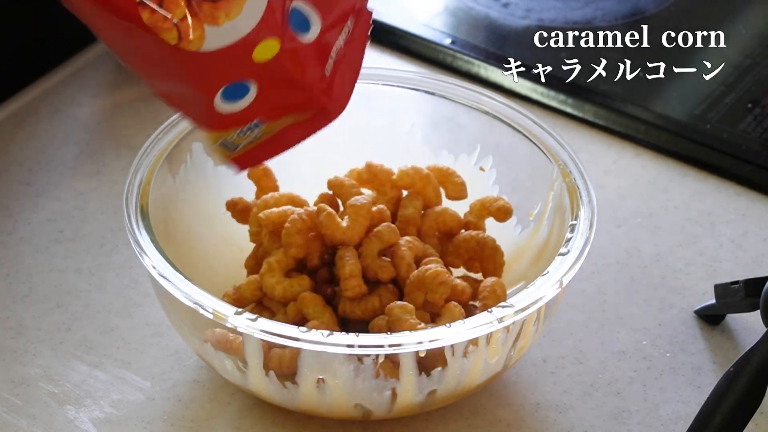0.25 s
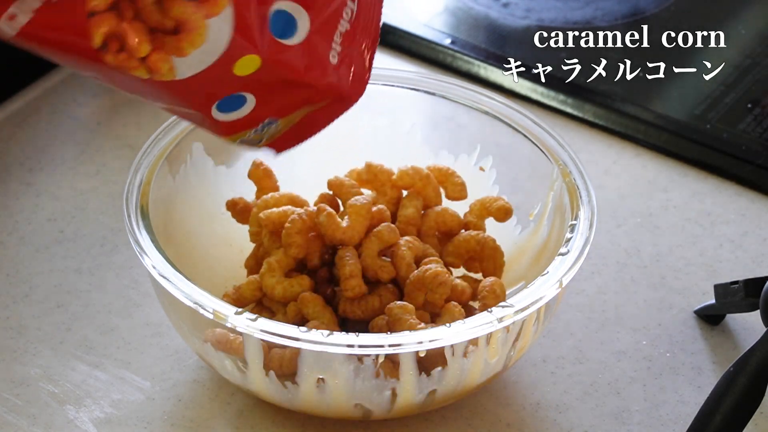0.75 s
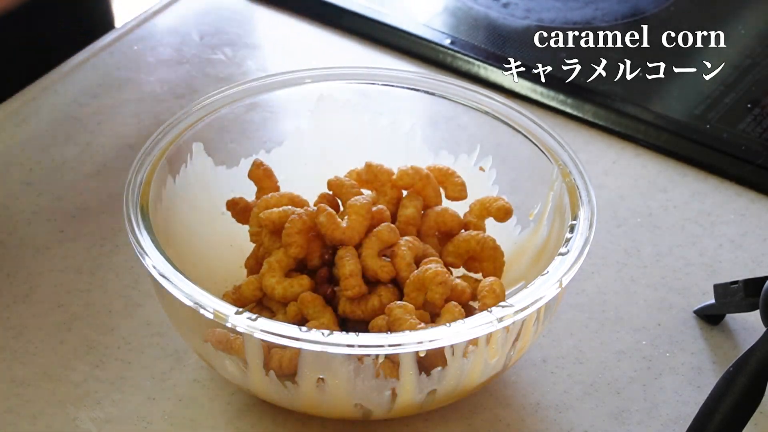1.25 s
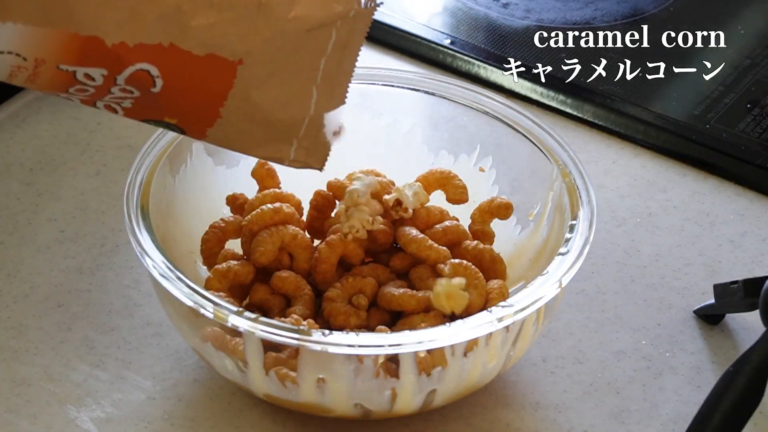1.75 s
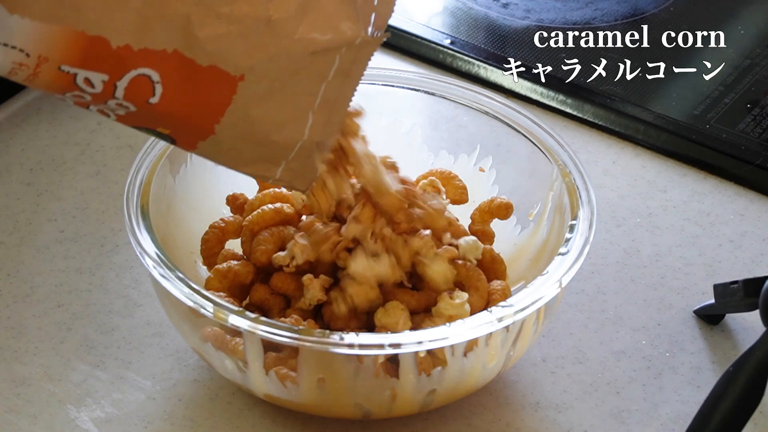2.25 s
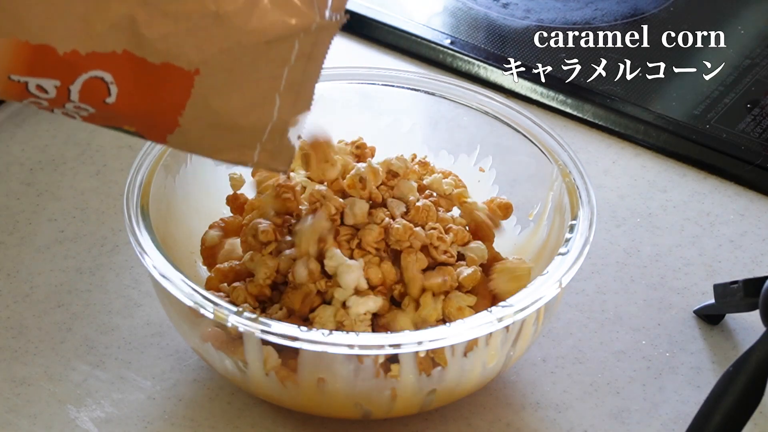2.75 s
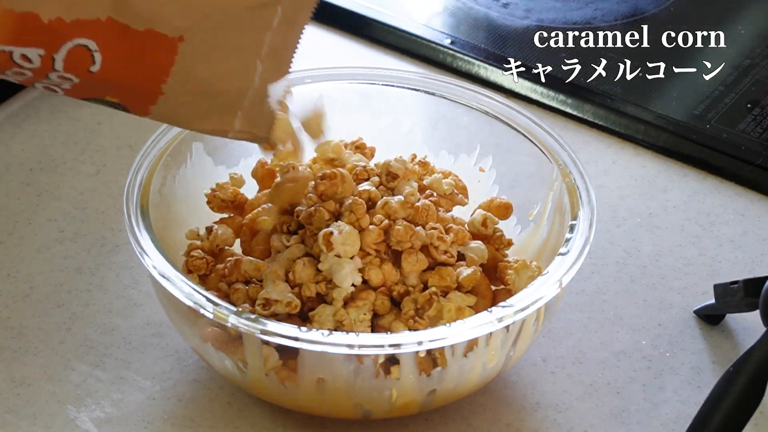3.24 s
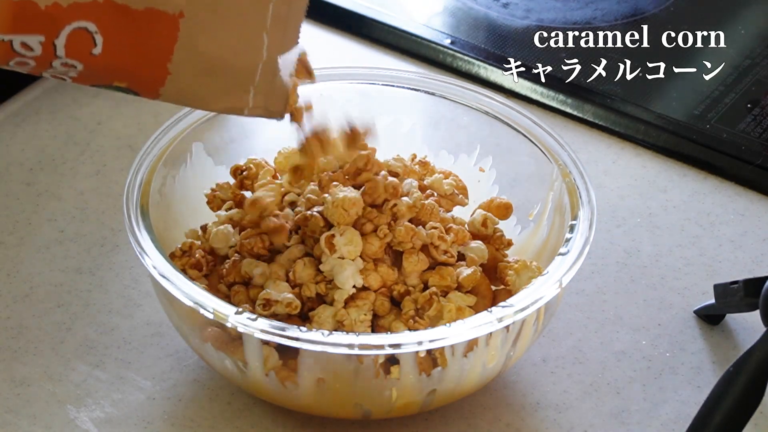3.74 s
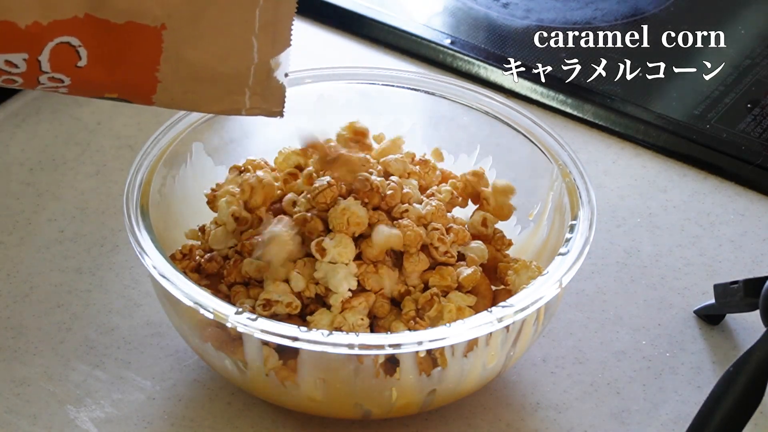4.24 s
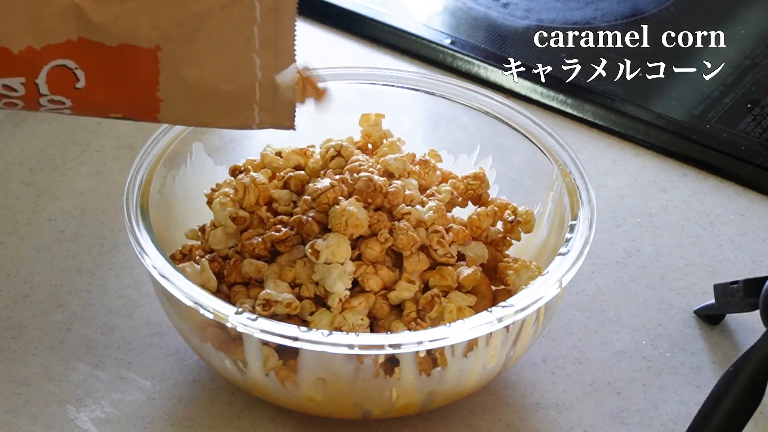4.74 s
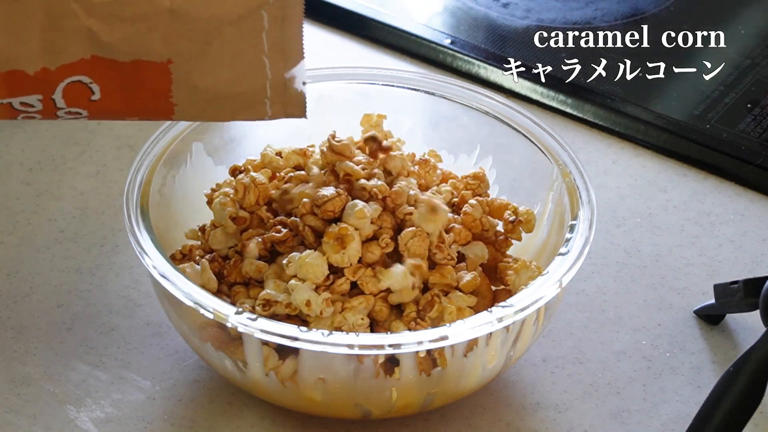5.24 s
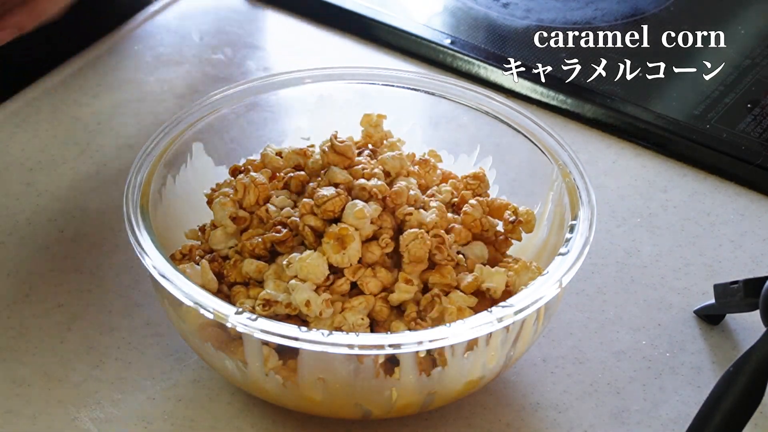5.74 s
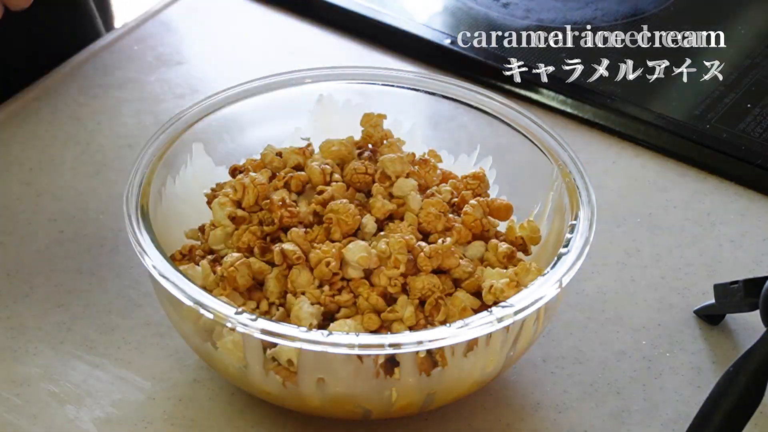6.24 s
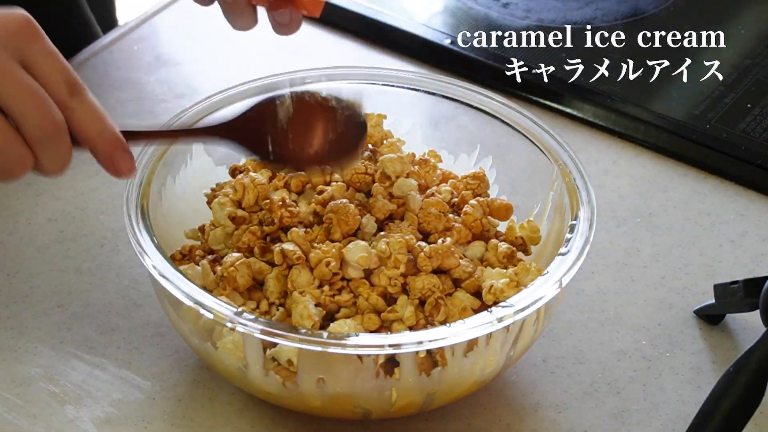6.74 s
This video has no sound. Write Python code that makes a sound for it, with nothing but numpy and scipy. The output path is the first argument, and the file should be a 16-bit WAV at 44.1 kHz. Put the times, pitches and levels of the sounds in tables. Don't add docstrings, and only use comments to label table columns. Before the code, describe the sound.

Puffed snacks and popcorn are shaken into a glass bowl on a counter, heard close in a small, dry kitchen. A bag snaps and is put aside dully; a second bag pours a thick crackling rustle, then smaller spurts with crisp snaps, hollow knocks and fine ticks. The pour dwindles, the empty bag scrapes and crumples loudly, then cuts to near silence over a low fridge hum, with a faint rustle at the very end.

```python
import sys
import numpy as np
from scipy import signal
from scipy.fft import rfft, irfft
from scipy.io import wavfile
from scipy.ndimage import uniform_filter1d

SR = 44100
rng = np.random.default_rng(int(sys.argv[2]) if len(sys.argv) > 2 else 0)


def field_ratio(decibels):
    return 10 ** (np.asarray(decibels, dtype=float) / 20)


def transcribe(u):
    v = np.clip(np.atleast_2d(u).T, -1, 1)
    q = np.round(v * 32767).astype(np.int16)
    wavfile.write(sys.argv[1], SR, q)


N = 308244

SHOT_EDGES = [0, 1.3935, 6.2475, 6.9185, 7]
BANDS_HZ = 2 ** np.arange(4.6, 14.3, .4)
# (frequency [Hz], level per Hz [dB])
PIECES_COLOUR = [(88, -28), (150, -13), (336, -7.5), (442, -7), (617, -9.5), (736, -2.5), (950, 0),
                 (1460, -1), (4310, -3.5), (9280, -12.5), (15200, -23.5), (16400, -20)]
CENTRES_HZ = [850, 2600, 6400, 12000]
USUAL_DB = [-4, 0, -5, -13]
# (time [s], rustle [dB], brightness [dB per octave])
FIRST_BAG = [(0.0, -42, 2.5), (0.16, -62, .3), (0.3, -72.5, -1.5), (0.86, -77, 5), (1.0, -53, 1.5),
             (1.13, -52, -3.5), (1.23, -55, 0), (1.393, -68, -6)]
# (time [s], rustle [dB], brightness [dB per octave])
FLOW = [(1.39, -47, 0), (1.45, -51.5, 2.5), (1.58, -44, -2), (1.71, -42.5, -0.5), (1.88, -38.5, -2),
        (2.19, -32, -0.8), (2.39, -31, 0.5), (2.67, -37.5, 2), (2.89, -44.5, 0.5), (3.17, -59.5, -2.5),
        (3.36, -37.5, 0.1), (3.75, -45, -1), (4.07, -40.5, -0.5), (4.41, -53.5, 2), (4.54, -56.5, -1),
        (5.05, -48.5, -2), (5.3, -52.5, 1), (5.5, -55, 0.5)]
# (time [s], rustle [dB], brightness [dB per octave])
DRAG = [(5.53, -53, -1), (5.62, -39, 1.5), (5.7, -32.5, 0.9), (5.79, -26, -2), (5.871, -23.5, -1),
        (5.97, -35, -0.5), (6.08, -38, -3), (6.22, -45.5, -0.8), (6.246, -46.5, 0)]
# (time [s], peak [dB], crackle [dB], pitch [octaves above 1 kHz])
HANDLING = [(0.0064, -14, -22.5, 2.3), (0.078, -21, -36, 1.8), (0.948, -16, -28.5, 2.9),
            (0.9874, -30, -52, 1), (1.0028, -12.5, -25, 1.2), (1.0374, -25, -34, 1.2),
            (1.063, -20, -34, 3.1), (1.093, -26, -32, 2.4), (1.1247, -25, -41, 2.5),
            (1.1303, -17, -43, 1.5), (1.1472, -17, -21.5, 1.14), (1.1593, -15, -22, 2.1),
            (1.279, -35.5, -36, 0.46), (1.333, -28, -35, 2.3), (1.34, -33, -40, 1.3),
            (5.6724, -25.5, -22, 0.74), (5.8147, -7, -27, 0.73), (5.9367, -14, -19, 2.4),
            (6.0154, -18.5, -23, 0.54), (6.0335, -23.5, -24.5, 1.1), (6.0536, -2, -6.5, 1.6),
            (6.112, -21, -25, 0.65), (6.129, -35, -20, 0.34), (6.2412, -13.5, -29, 1.6),
            (6.925, -31, -32, 2)]
# (time [s], peak [dB],
# crackle [dB], pitch [octaves above 1 kHz])
POURING_SNAPS = [(1.394, -23, -26.5, 1.6), (1.502, -19, -22, 1.1), (1.5187, 2.5, -6, 3.06),
                 (1.545, -13.5, -17.5, 1.2), (1.577, -16, -23, 0.76), (1.5921, -15, -19, 1.6),
                 (1.647, -27, -28, 0.85), (1.7447, -17.5, -22.5, 1.8), (1.8013, -18.5, -17.5, 1.5),
                 (1.8077, -20, -35, 1.4), (1.8884, -28, -24, 2.1), (1.9233, -16, -24, 0.76),
                 (1.96, -12, -15, 3.7), (1.9798, -7, -10.5, 1.96), (2.0163, -3, -15, 1.9),
                 (2.0204, -19, -14.5, 2.6), (2.043, -17, -13, 2.6), (2.136, -20, -25, 2),
                 (2.1787, -20, -19.5, 1.9), (2.2261, -7, -23.5, 1.2), (2.281, -18, -18, 1.7),
                 (2.415, -16, -26, 2.9), (2.479, -12, -28, 2.4), (2.6097, -20, -24, 1.6), (2.6898, -22, -26, 3.6),
                 (2.754, -11.5, -20, 1.2), (2.779, -16.5, -21, 1.6), (2.871, -23, -29, 3.3),
                 (2.924, -28, -34, 1.1),
                 (2.965, -31, -29.5, 3.3), (3.079, -20, -24.5, 3.6), (3.1533, -27.5, -51, 0.92),
           (3.198, -19, -30, 1.3), (3.2588, -2.5, -7, 2), (3.2674, -1.5, -29, 2.5), (3.2902, 2, -17, 3.1),
           (3.295, 0, -12, 1.5), (3.499, -22, -26, 2.3), (3.5633, -14, -17, 4.8), (3.6232, -32, -30, 2.1),
           (3.6676, -16, -38, 2.4), (3.693, -22, -26, 3.5), (3.7326, -20, -27, 2.8), (3.79, -26, -25, 2.5),
           (3.831, -21, -21, 3), (3.88, -21, -19.5, 4.1), (3.8873, -23, -26, 1.8), (3.901, -22, -36, 1.9),
           (3.961, -21, -16, 0.58), (4.0487, -28, -34, 1.5), (4.0676, -10.5, -23, 2.8),
           (4.1198, -24, -24, 2.2), (4.1459, -14, -27, 3.7), (4.2223, -10, -23, 2.2),
           (4.267, -24, -23, 3.8), (4.312, -18, -21.5, 4.3), (4.3237, -14, -33, 2), (4.37, -29, -34, 1.2),
           (4.3964, -26, -28, 2.8),
                 (4.4095, -28, -29.5, 2.2), (4.5656, -24, -27, 1.96), (4.6787, -24, -41, 1.2),
               (4.726, -24, -42, 1.3), (4.7735, -23, -29.5, 0.87), (4.8624, -33, -36, 1.1),
               (4.889, -22, -34.5, 2.8), (4.9435, -20, -30, 0.89), (5.007, -28, -41, 1.2),
               (5.017, -22.5, -27.5, 1.6), (5.064, -30, -20.5, 1.2), (5.076, -34, -21, 1.1),
               (5.1362, -21, -24.5, 3.8), (5.1667, -17, -27, 3.7), (5.2478, -32, -27, 4.2),
               (5.284, -17.5, -33, 3.1), (5.4126, -30, -39, 2.1), (5.4698, -23.5, -35.5, 0.23)]
SNAPS = HANDLING + POURING_SNAPS


def at_hz(points, hz):
    points = np.array(points)
    return np.interp(np.log(hz), np.log(points[:, 0]), points[:, 1])


def rms_one(x):
    return x / np.sqrt(np.mean(x ** 2) + 1e-20)


def band(x, low_hz, high_hz):
    return signal.sosfilt(signal.butter(2, [low_hz, high_hz], "band", fs=SR, output="sos"), x)


def ring(at_s, level_db, hz, t60):
    clicks = np.full(N, 1e-18)
    clicks[(np.asarray(at_s) * SR).astype(int)] = field_ratio(level_db)
    r, w = field_ratio(-60 / (t60 * SR)), 2 * np.pi * hz / SR
    return signal.lfilter([0, np.sin(w)], [1, -2 * r * np.cos(w), r * r], clicks)


def short_rings(s, peak_db, hz, cycles, spread):
    hz = hz[:, None] * 2 ** (spread * rng.standard_normal((len(s), 3)))
    turns = np.minimum(hz, 15000)[..., None] * np.arange(900) / SR
    soft_start = 1 - np.exp(-turns / (0.11 * cycles))
    rings = np.sum(np.sin(2 * np.pi * turns) * np.exp(-turns / cycles) * soft_start, axis=1)
    rings *= field_ratio(peak_db)[:, None] / np.abs(rings).max(axis=1, keepdims=True)
    where = (s * SR).astype(int)[:, None] + np.arange(900)
    return np.bincount(where.ravel(), rings.ravel(), N)


def rustle_and_snaps(rustle_db):
    # (frequency [Hz], side minus mid [dB])
    side_width = [(60, -20), (150, -36), (380, -13.5), (950, -20), (2380, -20), (5980, -6), (15000, -8)]
    busy = np.clip(field_ratio(.5 * (rustle_db[1] + 34.5)), .4, 6)
    wide = grains(700 * busy, spread_db=2.5, length_ms=2.0)
    crisp = grains(300 * busy, spread_db=1.5, length_ms=0.9)
    clumps = 0.51 + 0.46 * grains(45 * busy, spread_db=1.5, length_ms=32.0)
    where, shapes, snap_db = snap_shapes()
    white, out = rng.standard_normal((2, 2, N)), np.zeros((2, N))
    knots = N // 900 + 2
    place = np.interp(np.arange(N) / 900, np.arange(knots), rng.standard_normal(knots))
    white[:, 1] = 0.88 * white[:, 1] + 0.18 * place * white[:, 0]
    scrape = 0.34 * (np.abs(np.arange(N) / SR - 5.75) < .2)
    edges = BANDS_HZ[7:]
    for k, (low, high) in enumerate(zip(edges, edges[1:])):
        hz = np.sqrt(low * high)
        own_spread_db = -1.0 + 1.6 * np.clip(np.log2(hz / 3000), 0, 1)
        own = grains(900 * busy, own_spread_db, length_ms=np.clip(4000 / hz, .5, 8))
        treble = np.clip(np.log2(hz / 4000), 0, 1)
        shared = (1 - treble) * wide + treble * crisp
        contacts = (0.4 - 0.18 * treble) * shared + (0.36 + 0.1 * treble) * own
        contacts = contacts + scrape * (0.8 - contacts)
        power = field_ratio(2 * (shade_db(hz, rustle_db) + 9)) * contacts * clumps
        colour_db = shade_db(hz, snap_db) + 8.0 + 0.97 * rng.standard_normal(len(shapes))
        power += np.bincount(where, (field_ratio(2 * colour_db)[:, None] * shapes).ravel(), N)
        power = power * field_ratio(2 * empty_db(hz, np.arange(N)))
        level = np.sqrt(with_room(power, hz, room_db=-1.5))
        gain = field_ratio(at_hz(PIECES_COLOUR, hz)) * np.array([[1.4], [1.32 * field_ratio(at_hz(side_width, hz))]])
        out += gain * band(white[k % 2] * level, low, high)
    return out


def rustle_bands():
    # (time [s], rustle [dB], brightness [dB per octave])
    spoon = [
        (6.248, -85, 2.5),
        (6.67, -76.5, 4),
        (6.918, -80.5, 3.5),
        (6.919, -44.5, 2.5),
        (6.99, -54, 0.5),
    ]
    # (crest time [s], level [dB], length [s], brightness [dB per octave])
    slides = [(0.43, -67, 0.055, 2), (1.158, -48.5, 0.037, 4), (1.422, -43, 0.074, -2.5),
              (1.554, -35.5, 0.13, -2), (1.793, -36.5, 0.042, -1), (2.772, -46, 0.12, 0.5),
              (3.283, -41, 0.27, -0.8), (3.975, -33, 0.057, -0.5), (4.06, -42, 0.016, 2),
              (4.231, -37, 0.0073, 1.5), (4.602, -49, 0.048, -1.3), (4.767, -44.5, 0.055, -2.5),
              (4.928, -46, 0.037, 1.5), (5.081, -35, 0.055, -1.5), (5.171, -44, 0.06, 1)]
    t = np.arange(N) / SR
    s, levels, slopes = np.transpose(np.concatenate([FIRST_BAG, FLOW, DRAG, spoon]))
    level_db, bright = np.interp(t, s, levels), np.interp(t, s, slopes)
    up = np.log2(np.array(CENTRES_HZ) / CENTRES_HZ[1])[:, None]
    power = field_ratio(2 * (level_db + bright * up))
    shot = np.searchsorted(SHOT_EDGES, t)
    for s, db, length, slide_bright in slides:
        reach = length * np.where(t > s, 1.22, 1)
        swell = np.exp(-4 * ((t - s) / reach) ** 2) * (shot == np.searchsorted(SHOT_EDGES, s))
        power = power + field_ratio(2 * (db + slide_bright * up)) * swell
    return 10 * np.log10(power) + np.array(USUAL_DB)[:, None]


def grains(per_s, spread_db, length_ms):
    born = np.flatnonzero(rng.random(N) < 6000 / SR)
    draw = rng.random((len(born), 2))
    share = np.clip(per_s[born] / 6000, .01, 1)
    size = field_ratio(-2 * spread_db * np.maximum(np.log(draw[:, 1]), -4))
    clicks = np.zeros(N)
    clicks[born] = (draw[:, 0] < share) / share * size
    power = signal.lfilter([1], [1, -np.exp(-2000 / (length_ms * SR))], clicks + 1e-9)
    return power / power.mean()


def snap_shapes():
    s, peak_db, crackle_db, octaves = np.transpose(SNAPS)
    crest_db = (peak_db - crackle_db + 4.5)[:, None]
    ms = np.arange(2000) * 1000 / SR
    crack = field_ratio(1.25 * (crest_db - 12) + 1.5) * np.exp(-ms / 0.26)
    span = ms / np.interp(crest_db, [5, 11], [10, 3.2])
    rise = np.interp(crest_db, [5, 11], [2.5, 9])
    crackle = (1 - np.exp(-rise * span)) * np.exp(-span)
    crackle = crackle * field_ratio(4.3 * np.repeat(rng.standard_normal((len(s), 100)), 20, axis=1))
    crackle = 10.0 * crackle / np.sqrt(np.sum(crackle ** 2, axis=1, keepdims=True))
    where = np.minimum((s * SR).astype(int)[:, None] + np.arange(2000), N - 1)
    same_shot = np.searchsorted(SHOT_EDGES, where / SR) == np.searchsorted(SHOT_EDGES, s)[:, None]
    return where.ravel(), (crack ** 2 + crackle ** 2) * same_shot, snap_bands(crackle_db, octaves)


def snap_bands(crackle_db, octaves):
    return [usual - 4.0 + crackle_db - 2 * (np.log2(hz / 1000) - octaves) ** 2
            for usual, hz in zip(USUAL_DB, CENTRES_HZ)]


def shade_db(hz, by_band):
    weights = [np.interp(np.log(hz), np.log(CENTRES_HZ), row) for row in np.eye(4)]
    return sum(w * (db - usual) for w, db, usual in zip(weights, by_band, USUAL_DB) if w)


def empty_db(hz, at):
    # (frequency [Hz], level [dB])
    sleeve = [(270, -7), (430, -1), (800, -0.5), (1350, -4.5), (2200, 1), (9000, -1), (15000, -1)]
    dragged = (at > DRAG[0][0] * SR) & (at < DRAG[-1][0] * SR)
    far = (at > FIRST_BAG[3][0] * SR) & (at < SHOT_EDGES[1] * SR)
    far_db = -11.5 * max(np.log2(hz / 7000), 0)
    return at_hz(sleeve, hz) * dragged + far_db * far


def with_room(power, hz, room_db):
    # (frequency [Hz], t60 [s])
    room_decay = [(300, 0.083), (3000, 0.18), (14000, 0.19)]
    r = field_ratio(-120 / (at_hz(room_decay, hz) * SR))
    out = power.copy()
    for a, b in zip(SHOT_EDGES, SHOT_EDGES[1:]):
        shot = slice(round(a * SR), round(b * SR))
        out[shot] += signal.lfilter([field_ratio(2 * room_db) * (1 - r)], [1, -r], power[shot])
    return out


def hollow_pieces(rustle_db):
    born = np.flatnonzero(rng.random(N) < 900 / SR)
    draw = rng.random((len(born), 2))
    out = np.zeros(N)
    for k, hz in enumerate(np.geomspace(750, 8500, 24)):
        mine = (draw[:, 0] * 24).astype(int) == k
        at = born[mine]
        size_db = -3.5 * np.maximum(np.log(draw[mine, 1]), -3) + 9.0 * np.log2(hz / 2500)
        level_db = shade_db(hz, rustle_db[:, at]) + empty_db(hz, at) + at_hz(PIECES_COLOUR, hz) - 5.0 + size_db
        out += ring(at / SR, level_db, hz, t60=66.0 / hz)
    return band(out, 440, 12000)


def cracks():
    # (time [s], peak [dB], pitch [Hz])
    creases = [(1.5189, -18, 5740), (1.961, -11.5, 8700), (1.9796, -19, 4800), (2.9672, -14.5, 7330),
               (3.0799, -19.5, 7800), (3.5633, -21, 8530), (3.669, -11.5, 5950), (3.789, -10.5, 6600),
               (4.2682, -23, 5750), (4.371, -27, 7200), (5.1341, -17, 5660), (5.3, -26, 6600),
               (6.0536, -14, 4700)]
    s, peak_db, _, octaves = np.transpose(SNAPS)
    at_s, tick_db, hz = np.transpose(creases)
    snaps = short_rings(s, peak_db - 7, 1000 * 2 ** octaves, cycles=1, spread=0.27)
    return snaps + short_rings(at_s, tick_db - 2.5, hz, cycles=3.8, spread=0.06)


def landings():
    # (time [s], peak [dB], pitch [Hz])
    knocks = [(0.9495, -45, 890), (1.0021, -33, 1720), (1.1307, -33, 1630), (1.1608, -32, 1350),
              (1.2791, -40.5, 910), (1.34, -40, 1230), (1.399, -31, 1200), (1.4193, -28, 990),
              (1.5196, -15.5, 1160), (1.5793, -20.5, 1000), (1.5938, -31, 1550), (1.7455, -35, 1350),
              (1.8083, -31, 1750), (1.9327, -27, 1500), (1.981, -15, 1330), (2.0165, -23, 1710),
              (2.1535, -36, 810), (2.2066, -30, 990), (2.2266, -32, 1770), (2.2632, -22.5, 1060),
              (2.2888, -21, 1040), (2.3706, -32, 1310), (2.4147, -21, 1120), (2.6224, -26.5, 1020),
              (2.7548, -26, 1200), (2.7813, -22.5, 1174), (3.2626, -16.5, 1030), (3.294, -13, 1400),
              (3.5762, -29, 1340), (3.6258, -28, 1730), (3.9019, -31, 1660), (3.9784, -22, 1200),
              (4.3231, -32, 1580), (4.6801, -36, 1690), (4.767, -32, 1180), (4.86, -37, 1020),
              (4.9446, -35, 1120), (5.0783, -24.5, 1140), (5.4705, -37, 980), (5.6735, -25, 940),
              (5.6873, -26, 915), (5.7578, -29, 1750), (5.7899, -18.5, 966), (5.8173, -25, 980),
              (5.8783, -26, 930), (5.9447, -28, 736), (6.0161, -25, 1000), (6.0526, -12.5, 800),
              (6.1333, -24, 860), (6.2416, -30, 1680), (6.9283, -37, 1530)]
    # (time [s], peak [dB], pitch [Hz])
    taps = [(0.0074, -17.5, 3180), (0.0778, -28, 4950), (0.9486, -33, 3620), (1.0032, -21, 3900),
            (1.1485, -25, 4530), (1.1595, -28, 3350), (1.3413, -37, 3250), (1.5249, -13, 3160),
            (1.5454, -20, 2230), (1.5944, -31, 1530), (1.7455, -32, 1430), (1.807, -18, 3940),
            (1.924, -30, 1770), (1.9817, -17, 4050), (2.0167, -14.5, 2100), (2.0441, -13, 4290),
            (2.1843, -18, 4230), (2.4158, -17, 3440), (2.7612, -20, 4170), (2.781, -24, 2480),
            (2.8789, -27, 3250), (2.968, -30, 4840), (3.0814, -24, 3200), (3.1594, -28, 2190),
            (3.2011, -26, 2380), (3.2659, -9, 5160), (3.2938, -17, 3360), (3.6691, -30, 5490),
            (3.7322, -25, 3470), (3.8458, -35, 4870), (3.889, -24, 2960), (3.902, -26, 2830),
            (3.9768, -19, 2280), (4.0637, -27, 4210), (4.1205, -25, 3450), (4.2233, -31, 3660),
            (4.2315, -27, 3860), (4.3238, -24, 3120), (4.5654, -28, 2850), (5.083, -24, 3700),
            (5.0926, -23, 5060), (5.136, -20, 5490), (5.6744, -25.5, 2180), (5.7491, -18, 3680),
            (5.7691, -21, 2210), (5.8572, -20, 3200), (5.8728, -20, 3120), (5.9407, -20, 4420),
            (6.0542, -8.5, 4750), (6.2424, -24, 3570), (6.9252, -31, 3410), (6.9353, -30.5, 3180)]
    # (time [s], peak [dB], pitch [Hz])
    ticks = [(0.004, -21.5, 6600), (1.1254, -31, 8900), (1.1599, -27, 4880), (1.2875, -50.5, 10600),
             (1.5322, -22, 6020), (1.547, -24, 4860), (1.5944, -23.5, 6900), (2.0167, -18, 4300),
             (2.0443, -19, 7210), (2.2273, -21, 6540), (2.2821, -19, 6750), (2.4178, -20, 6060),
             (2.7815, -25, 4700), (2.8722, -25, 5700), (3.2733, -15, 4930), (3.2941, -12.5, 7210),
             (3.3487, -25, 13000), (3.5213, -30, 11400), (3.557, -31, 14810), (3.6214, -26, 7500),
             (3.645, -28, 5380), (3.6545, -26, 13600), (3.6941, -28, 6100), (3.6995, -27, 13500),
             (3.7357, -26, 5630), (3.8496, -27, 12800), (3.858, -25, 5600), (3.8799, -21, 7120),
             (3.9898, -33, 14500), (4.0925, -33, 14800), (4.1205, -27, 5910), (4.1348, -26.5, 7900),
             (4.1478, -23, 11580), (4.1845, -27, 5660), (4.2205, -34, 14500), (4.2244, -31, 5720),
             (4.236, -25, 5560), (4.2676, -27, 11600), (4.3117, -32, 15050), (4.3233, -30, 7050),
             (4.3965, -38, 14600), (4.5039, -33, 6700), (4.5722, -33, 8450), (4.9395, -33, 8680),
             (5.0166, -36, 4900), (5.1675, -22.5, 6200), (5.3068, -30, 7000),
             (1.593, -32, 11300), (1.6905, -32.5, 10800), (1.7724, -31, 12300), (1.8911, -35.5, 11700),
                  (2.177, -35, 12200), (4.4468, -38, 11500), (4.9262, -37, 14400), (5.462, -48, 13800)]
    # (time [s], level [dB], frequency [Hz], t60 [s])
    lone_rings = [
        (0.001, -30, 2837, 0.22),
        (0.415, -58, 5538, 0.2),
        (3.407, -30.5, 2837, 0.16),
    ]
    out = sum(ring([s], db, hz, t60) for s, db, hz, t60 in lone_rings)
    kinds = [(knocks, -0.5, 3.65, 0.043), (taps, -1.5, 6.4, 0.059), (ticks, 2, 6.1, 0.053)]
    for table, gain_db, cycles, spread in kinds:
        s, peak_db, hz = np.transpose(table)
        out = out + short_rings(s, peak_db + gain_db, hz, cycles, spread)
    return out


def film(rustle_db):
    born = np.flatnonzero(rng.random(round(FLOW[-1][0] * SR)) < 70 / SR)
    draw = rng.random((len(born), 2))
    peak_db = rustle_db[-1, born] + 12.5 - 4.0 * np.maximum(np.log(draw[:, 0]), -3)
    return short_rings(born / SR, peak_db, 7000 * 2 ** draw[:, 1], cycles=6.1, spread=0.053)


def glass():
    # (time [s], level [dB], softness [dB lost per octave above 1.5 kHz])
    clinks = [(0.00083, -34.5, 22), (2.4781, -25, -1.5), (3.02, -46, 11.5), (3.407, -39, 10),
              (4.121, -36.5, 11), (4.1566, -37.5, 7), (4.222, -55, 13)]
    # (frequency [Hz], t60 [s])
    modes = [(587, 0.89), (1545, 0.47), (2837, 0.21), (4436, 0.085), (6225, 0.089)]
    mode_levels = [-17.5, -2, 5, 6.5, 3.5]
    s, strike_db, soft = np.transpose(clinks)
    out = 0
    for mode_db, (hz, t60) in zip(mode_levels, modes):
        db = strike_db + mode_db - soft * max(np.log2(hz / modes[1][0]), 0)
        twin = ring(s, db - 15, hz * 1.012, t60)
        out = out + ring(s, db, hz, t60) - ring(s, db, hz, 0.00066) + twin
    return band(out, 430, 11800)


def thuds():
    # (time [s], peak [dB], frequency [Hz])
    bumps = [(1.095, -38, 336), (1.123, -39, 129), (1.143, -43, 223), (1.205, -43.5, 227),
             (3.251, -37, 280), (3.471, -41, 179), (4.059, -38.5, 282), (6.041, -43.5, 119),
             (6.959, -46, 117)]
    knocked = sum(ring([s], db + 1, hz, t60=0.16) for s, db, hz in bumps)
    return signal.lfilter([.03], [1, -.97], knocked)


def rumble():
    s, rustle = np.transpose(FLOW)[:2]
    flow_db = np.interp(np.arange(N) / SR, s, rustle, left=-150, right=-150)
    return field_ratio(-38 + 0.47 * flow_db) * rms_one(band(rng.standard_normal(N), 80, 280))


def room_air():
    # (frequency [Hz], level per Hz [dB])
    air_colour = [(24, -28), (40, -51), (71, -8.5), (239, -5), (405, -13.5), (3190, -23), (4430, -26),
                  (5020, -28), (5560, -28), (15200, -42.5), (16400, -41)]
    white, out = rng.standard_normal((2, 2, N)), np.zeros((2, N))
    for k, (low, high) in enumerate(zip(BANDS_HZ[2:], BANDS_HZ[3:])):
        hz = np.sqrt(low * high)
        side_db = np.interp(np.log2(hz), [6, 10, 13], [-20, -16, -5])
        out += field_ratio(at_hz(air_colour, hz)) * band(white[k % 2], low, high) * [[1], [field_ratio(side_db)]]
    return out * field_ratio(-49.5 - 6.5) / np.std(out[0])


def fridge():
    # (frequency [Hz], width [Hz], level [dB])
    resonances = [(48.4, 2, -67), (96.9, 8, -73), (209.9, 12, -69), (236.9, 10, -68), (4570, 50, -76.5),
                  (5453, 24, -74.5)]
    out = np.zeros(N)
    for hz, width, level_db in resonances:
        r, hum = np.exp(-np.pi * width / SR), rng.standard_normal(N + SR)
        for _ in range(2):
            hum = signal.lfilter([1, 0, -1], [1, -2 * r * np.cos(2 * np.pi * hz / SR), r * r], hum)
        hum = rms_one(hum[SR:])
        hum /= np.sqrt(uniform_filter1d(hum ** 2, size=900) + 0.043)
        out += field_ratio(level_db) * hum
    return out


def scene():
    rustle_db = rustle_bands()
    strikes = band(cracks() + landings() + film(rustle_db), 340, 17000)
    near = hollow_pieces(rustle_db) + strikes + glass() + thuds() + rumble()
    mid, side = rustle_and_snaps(rustle_db) + near * [[1], [.12]] + room_air() + fridge() * [[1], [0]]
    return np.array([mid + side, mid - side])


def top_cut(x):
    return signal.sosfilt(signal.butter(12, 16680, fs=SR, output="sos"), x)


def record(dry):
    # (frequency [Hz], left minus right [dB])
    left_louder = [(60, -1), (250, 1.5), (1000, -0.5), (4000, 1), (8000, 0.5), (13000, 1.5)]
    hz = np.maximum(np.fft.rfftfreq(N, 1 / SR), 1)
    lean = field_ratio(at_hz(left_louder, hz) * np.array([[.5], [-.5]])) * (hz < 15850)
    lean = lean * np.exp(1j * np.pi * hz * 8e-6 * np.array([[1], [-1]]))
    rounded = 1.302 * np.tanh(dry / 1.617)
    return top_cut(irfft(rfft(rounded) * lean, N))


dry = scene()
out = record(dry)
transcribe(out)
```